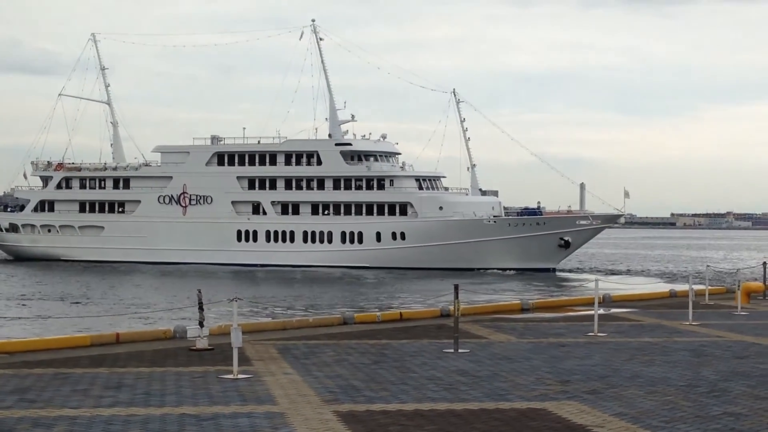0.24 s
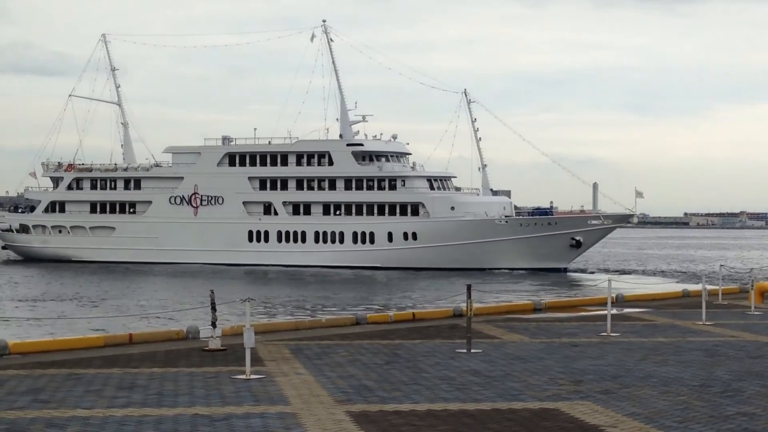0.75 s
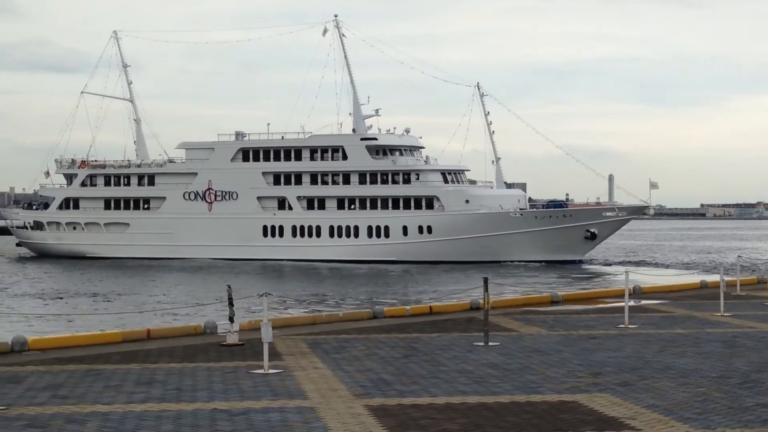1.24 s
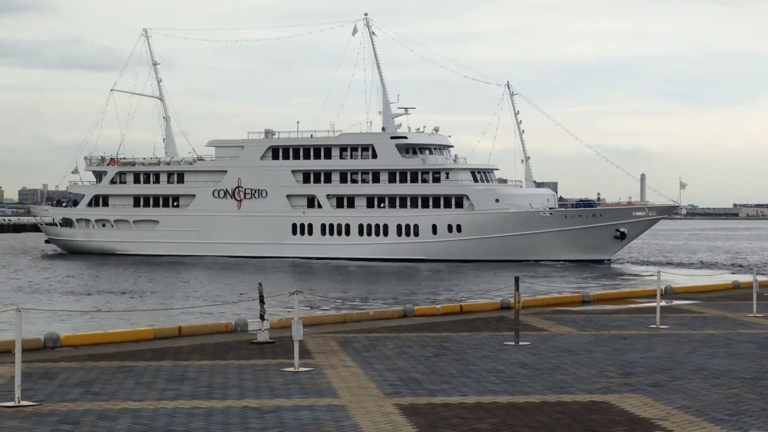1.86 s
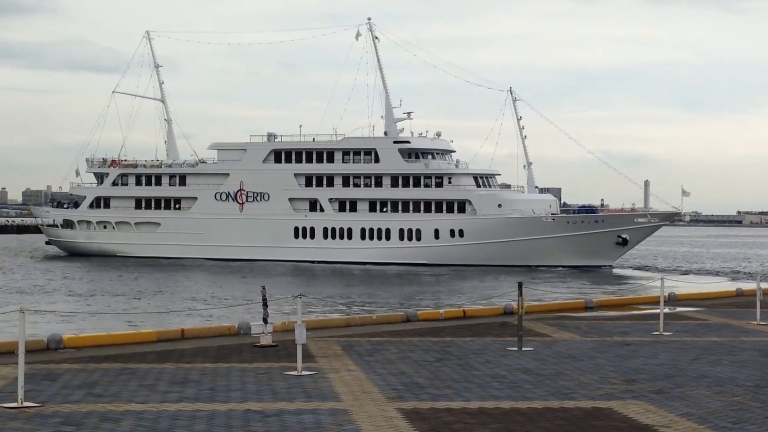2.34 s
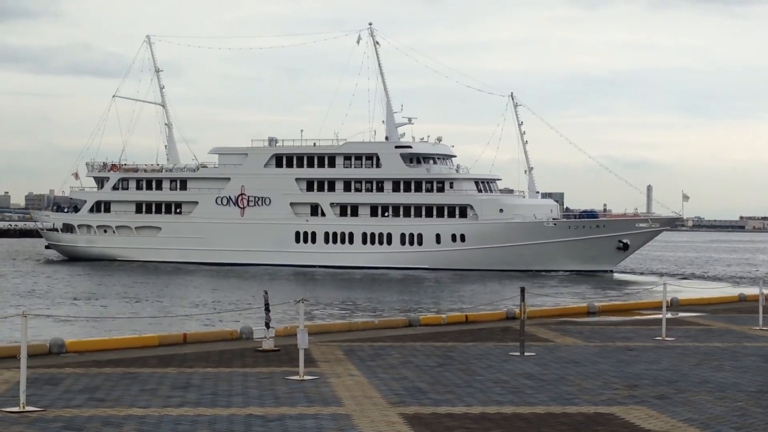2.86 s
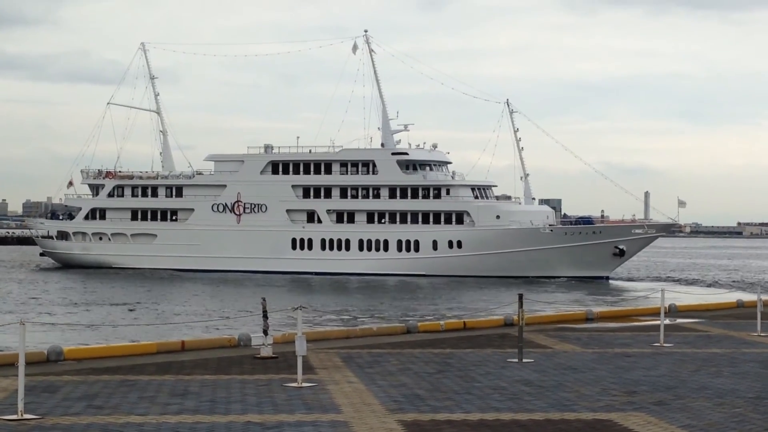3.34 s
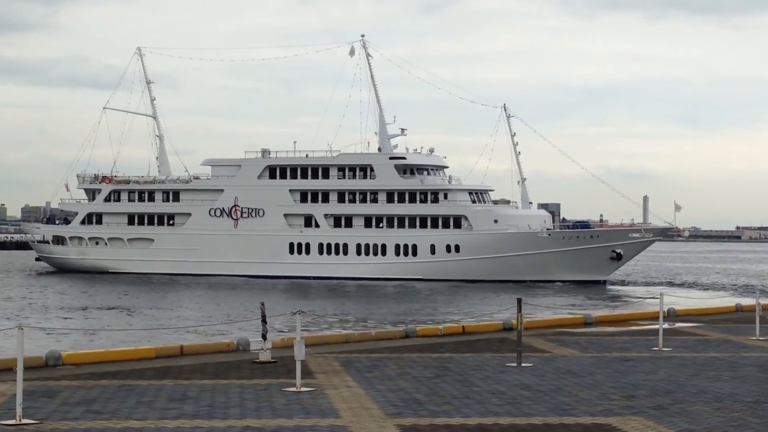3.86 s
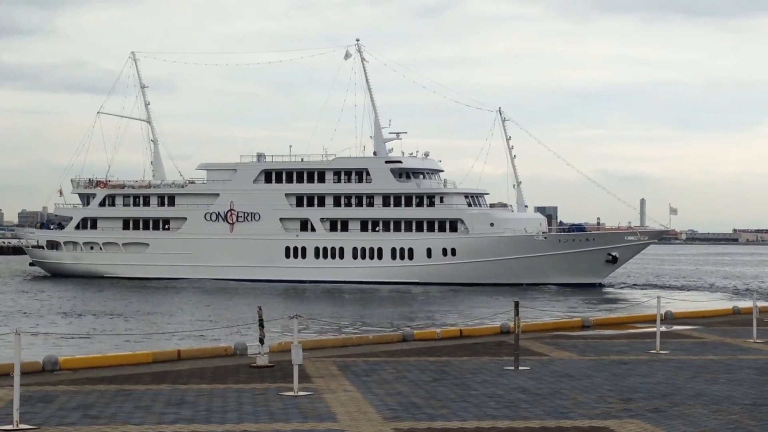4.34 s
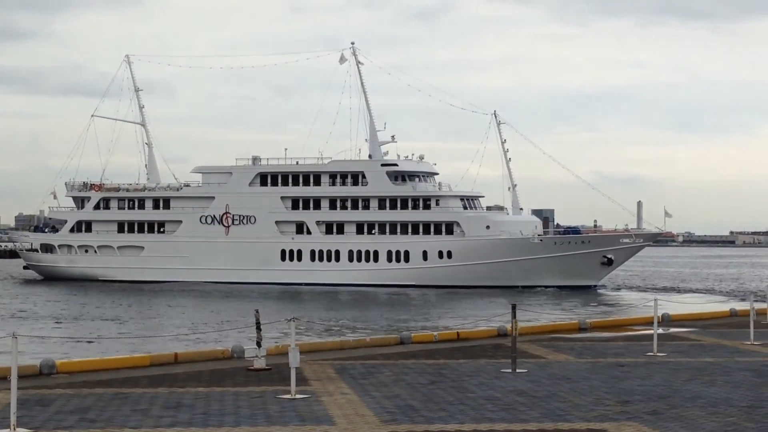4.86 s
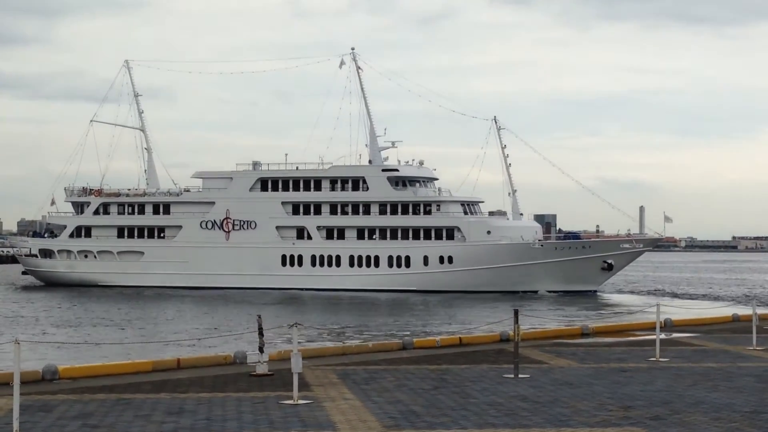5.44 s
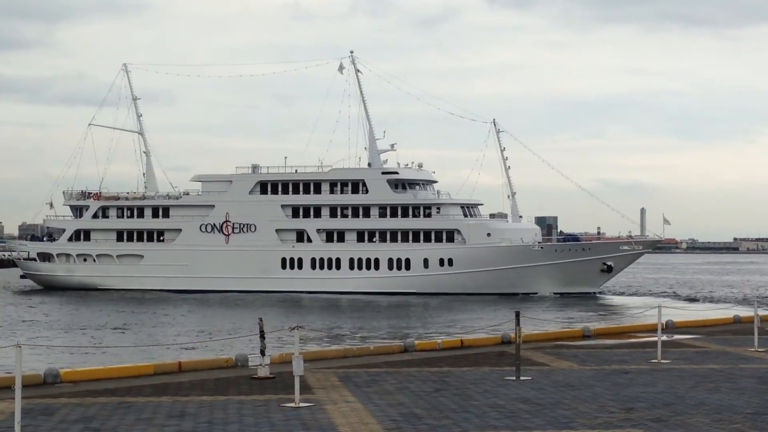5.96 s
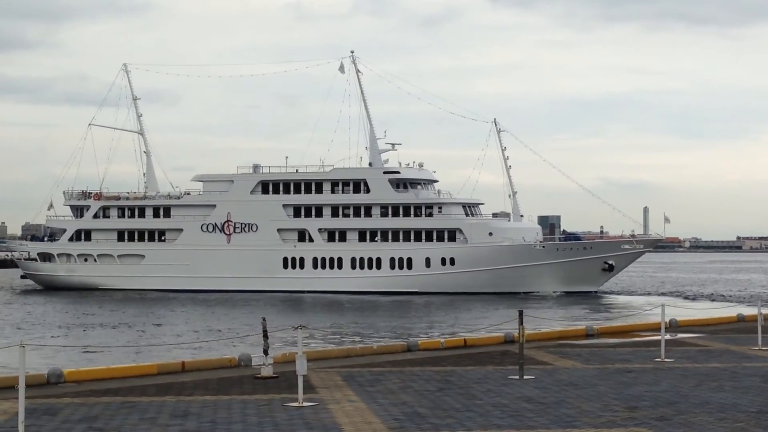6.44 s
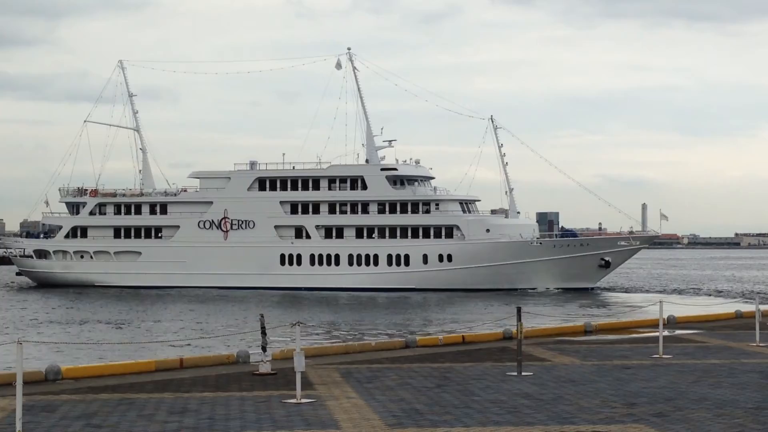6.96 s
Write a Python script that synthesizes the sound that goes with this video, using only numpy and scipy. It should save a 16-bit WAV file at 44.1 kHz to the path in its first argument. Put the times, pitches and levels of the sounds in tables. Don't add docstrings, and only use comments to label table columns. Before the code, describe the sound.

Outdoors by a harbour, deep ship engines hum and beat slowly over gusty low rumble, hissing water and a small knock.

```python
import sys
import numpy as np
from scipy import signal
from scipy.fft import rfft, irfft, next_fast_len
from scipy.io import wavfile
from scipy.ndimage import uniform_filter1d

SR = 44100
rng = np.random.default_rng(int(sys.argv[2]) if len(sys.argv) > 2 else 0)


def output_pcm(signal):
    pcm = np.clip(np.atleast_2d(signal).T, -1, 1) * 32767
    wavfile.write(sys.argv[1], SR, np.round(pcm).astype(np.int16))


def undo_db(level):
    steps = np.asarray(level, float) / 20
    return 10 ** steps


N = 317520
TIME = np.arange(N) / SR


def columns(table):
    s, *cols = np.transpose(table)
    return [np.interp(TIME, s, c) for c in cols]


def walk(rate):
    hold = int(SR / rate)
    steps = np.repeat(rng.standard_normal(N // hold + 1), hold)
    return 1.32 * uniform_filter1d(uniform_filter1d(steps, hold), hold)[:N]


def tone(hz, db, wander):
    in_step_s = 6.015
    turns = np.cumsum(hz * np.ones(N)) / SR
    turns = turns - turns[int(in_step_s * SR)]
    return np.sqrt(2) * undo_db(db) * np.cos(2 * np.pi * turns + wander)


def living_noise(spectrum, change, shared_db, own_db, rate):
    steady_above_hz, steady_share = 6000, 0.56
    size = next_fast_len(N)
    octave = np.log2(np.maximum(np.fft.rfftfreq(size, 1 / SR), 1))
    hz, db = np.transpose(spectrum)
    colour = undo_db(np.interp(octave, np.log2(hz), db, -200, -200))
    noise = rfft(rng.standard_normal(size)) * np.sqrt(SR / 2) * colour
    shared, out = walk(rate), 0
    for mid in np.arange(np.log2(hz[0]), np.log2(hz[-1]) + .5, .5):
        mask = np.cos(np.pi / 2 * np.clip(2 * (octave - mid), -1, 1)) ** 2
        flicker_db = shared_db * shared + own_db * walk(rate)
        if 2 ** mid > steady_above_hz:
            flicker_db = flicker_db * steady_share
        out = out + undo_db(change(mid) + flicker_db) * irfft(noise * mask, size)[:N]
    return out


def stirring(curve, peak_hz, reach_octaves, events, length_s, octaves):
    t = TIME[::64]
    slow = np.interp(t, *np.transpose(curve))
    s, hz, db = np.transpose(events)
    bumps = np.exp(-((t - s[:, None]) / length_s) ** 2)

    def change(mid):
        swell_db = slow * np.exp(-((mid - np.log2(peak_hz)) / reach_octaves) ** 2)
        nearness = np.exp(-((mid - np.log2(hz)) / octaves) ** 2)
        db_now = swell_db + (db * nearness) @ bumps
        return np.interp(TIME, t, db_now - db_now.mean())
    return change


def diesels():
    # t/s, firing rate f/Hz
    near_speed = [(0, 41.35), (1.3, 41.35), (1.7, 41.2), (2.1, 41.34), (3.9, 41.34), (4.5, 41.46),
                  (5.2, 41.35), (6.1, 41.35), (6.5, 41.16), (7.0, 41.3), (7.2, 41.35)]
    # t/s, near engine level/dB, far engine level/dB
    path = [(0.0, -46, -43.5), (0.3, -32, -29.5), (0.9, -41.4, -39), (1.2, -32.5, -36.5), (1.5, -47, -31.5),
            (1.8, -33, -29), (2.1, -36, -31.5), (2.4, -39, -32), (3.0, -52, -30.5), (3.4, -46, -32),
            (4.2, -44, -32), (4.5, -43, -37), (4.8, -40, -35), (5.4, -32.5, -26.5), (6.0, -32, -26.5),
            (6.6, -34, -28.5), (6.95, -30, -27.5), (7.2, -35, -28)]
    far_hz, far_octave_db, flutter_db = 87.315, -21.5, 2.5
    second, far = columns(path)
    swell = far + 31
    first = -50 + .9 * swell + flutter_db * walk(3)
    third = -43 + 0.33 * swell + flutter_db * walk(3.01)
    near_hz, = columns(near_speed)
    drift, far_drift = .08 * walk(2.5), .1 * walk(2.5)
    levels = (first, second - .6, third)
    near = sum(tone(k * near_hz, db, k * drift) for k, db in enumerate(levels, start=1))
    far_octave = tone(2 * far_hz, far + far_octave_db, 2 * far_drift)
    return near + tone(far_hz, far, far_drift) + far_octave


def generator():
    # f/Hz, rms level/dB
    hum = [
        (59.72, -53),
        (119.44, -49),
    ]
    return sum(tone(hz, db + 2.0 * walk(1.51), 0.47 * walk(1.24)) for hz, db in hum)


def funnel_and_wind():
    # f/Hz, level/dB per Hz
    rumble = [(18, -82), (30, -70), (38, -57), (52, -63.5), (68, -52.5), (100, -56), (150, -56.5),
              (200, -63.5), (250, -67), (320, -66.5), (410, -76), (550, -76), (800, -81.5), (1400, -105)]
    # t/s, strength level/dB
    breeze = [
        (0, -1.5),
        (1.3, -0.5),
        (2.8, 1),
        (3.2, -6.5),
        (4.2, 1.5),
        (4.6, -0.5),
        (5.2, -6.5),
        (5.8, 6),
        (7.2, -3.5),
    ]
    # t/s, centre f/Hz, lift level/dB
    buffets = [(.08, 60, 5), (.16, 170, 2), (.26, 60, -4), (.38, 140, 6.5), (.78, 169, 6.5),
               (.84, 105, 5.5), (1.06, 60, 8), (1.06, 170, 7.5), (1.2, 69, 11), (1.68, 160, 6.5),
               (2.13, 170, 4), (2.28, 80, 7), (2.61, 170, 5), (2.73, 75, 10.5), (2.85, 90, 4.5),
               (3.11, 121, 3), (3.51, 168, 6.5), (3.63, 110, 3), (4.49, 60, 8), (4.73, 170, 3),
               (5.11, 136, 10), (5.31, 100, 6), (5.77, 70, 9), (5.9, 170, 2.5), (6.0, 70, 11), (6.4, 60, 3),
               (6.6, 70, 3), (6.98, 60, 10), (7.14, 170, 4), (7.2, 400, 8)]
    # t/s, centre f/Hz, change level/dB
    surges = [(0.0, 160, -6.5), (.95, 260, 2.5), (1.35, 202, -8.5), (1.9, 260, 6.5), (2.27, 210, -4),
              (3.7, 140, 4), (4.52, 240, -7), (5.0, 200, -3.5), (5.6, 170, 3), (6.2, 270, 5),
              (6.75, 270, 4), (.92, 90, -6), (5.4, 330, 3), (2.05, 280, 2.5)]
    wind = stirring(breeze, 61, .9, buffets, length_s=.05, octaves=0.59)
    funnel = stirring([(0, 0), (1, 0)], 200, 1, surges, length_s=0.15, octaves=0.55)
    return living_noise(rumble, lambda mid: wind(mid) + funnel(mid), shared_db=0.86, own_db=1.5, rate=8)


def hull_water():
    # f/Hz, level/dB per Hz
    water = [(600, -92.5), (1150, -83), (1350, -85.5), (1850, -84), (2150, -88), (2460, -86), (2600, -95),
             (2760, -94), (3600, -92.5), (3900, -91.5), (4450, -92.5), (5500, -101), (8000, -108),
             (16000, -110)]
    # t/s, flow level/dB
    flow = [
        (0, 1.5),
        (2.0, 1),
        (2.5, -0.5),
        (4.0, -0.4),
        (4.8, 1.8),
        (5.4, 3),
        (6.1, 3),
        (7.2, 2.5),
    ]
    # t/s, centre f/Hz, lift (or dip) level/dB
    splashes = [(.02, 2200, 4), (.14, 3500, 5.5), (.2, 1800, 2), (.79, 4000, 3), (1.41, 4150, 7),
                (2.03, 5000, 2), (3.16, 4000, -1), (3.22, 3000, 4.5), (3.52, 8000, 5), (4.07, 1800, 4),
                (4.16, 5000, 4), (4.45, 4000, 6), (4.87, 3500, 2.5), (5.27, 4000, 1), (5.59, 4000, 4),
                (5.92, 2000, 1), (5.95, 7500, 4), (6.16, 1800, 1), (6.19, 4000, 2.5), (6.48, 2800, -2),
                (6.76, 9000, 3), (6.94, 4300, 4), (7.07, 3000, -1), (7.16, 1800, 2)]
    churn = stirring(flow, 3650, 1.17, splashes, length_s=.022, octaves=0.44)
    return living_noise(water, churn, shared_db=0.44, own_db=1.0, rate=28)


def wake_bubbles():
    count, low_hz, high_hz = 900, 300, 4800
    level_db, spread_db, ring_s = -65.5, 1.5, .014
    out, t = np.zeros(N + SR // 8), np.arange(SR // 8) / SR
    for when, pitch, size, life in rng.random((count, 4)):
        hz = low_hz * (high_hz / low_hz) ** pitch
        tau = ring_s * (0.415 + life)
        swell_and_fade = t / tau * np.exp(1 - t / tau)
        ring = np.sin(2 * np.pi * hz * t * (1 + 0.012 * t / tau)) * swell_and_fade
        db = level_db - spread_db * np.log(size + 0.00093) - 2.3 * np.log2(hz / 1000)
        i = int(when * N)
        out[i:i + len(t)] += undo_db(db) * ring
    return out[:N]


def screened(end_s):
    fade_s = .3
    return 1 / (1 + np.exp((TIME - end_s) / fade_s))


def turbocharger():
    hz = 3950 * (1 + .012 * walk(4) + .02 * walk(150))
    return tone(hz, -68.5 + 1.5 * walk(9), 0) * screened(2.3)


def blower():
    hum = tone(264.7, -53 + 2.5 * walk(3.02), 1.2 * walk(4))
    return hum * (0.33 + 0.6 * screened(3.65))


def birds_and_creaks():
    # t/s, length/s, start f/Hz, end f/Hz, peak level/dB
    calls = [
        (4.04, .12, 1550, 1720, -53.5),
        (4.045, .14, 5000, 5050, -63.5),
        (4.398, .008, 650, 600, -40),
        (4.443, .022, 4320, 4200, -51),
        (4.456, .012, 3750, 3600, -59),
        (5.883, .022, 2000, 1900, -51),
        (5.9, .022, 7200, 7200, -68),
        (5.905, .02, 9100, 9200, -72),
        (6.935, .014, 4500, 4300, -53),
    ]
    out = np.zeros(N)
    for s, length, hz0, hz1, db in calls:
        n, i = int(length * SR), int(s * SR)
        rough = .3 + 4 * length
        hz = np.linspace(hz0, hz1, n) + 150 * rough * walk(400)[:n]
        shape = undo_db(db) * signal.windows.tukey(n, .3) * (1 + .6 * rough * walk(300)[:n])
        out[i:i + n] += shape * np.sin(2 * np.pi * np.cumsum(hz) / SR)
    return out


def scene():
    ship = diesels() + generator() + turbocharger() + blower()
    air_and_water = funnel_and_wind() + hull_water() + wake_bubbles()
    return (ship + air_and_water + birds_and_creaks())[None]


def band_limit(x):
    return signal.sosfilt(signal.butter(12, 16410, fs=SR, output="sos"), x)


def record(dry):
    top_hz = 15340
    spectrum = rfft(dry) * (np.fft.rfftfreq(N, 1 / SR) < top_hz)
    return band_limit(irfft(spectrum, N))


dry = scene()
out = record(dry)
output_pcm(out)
```